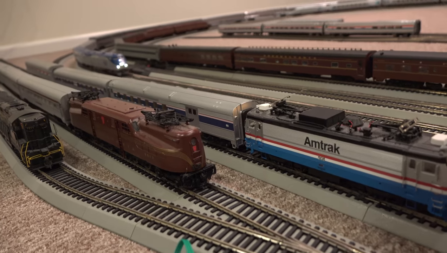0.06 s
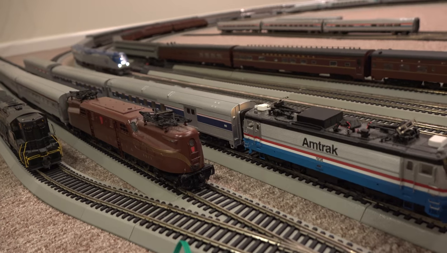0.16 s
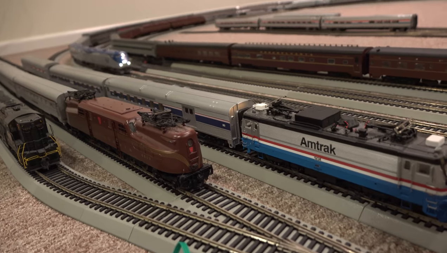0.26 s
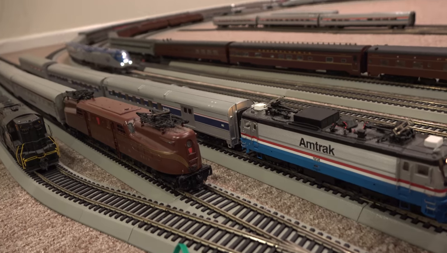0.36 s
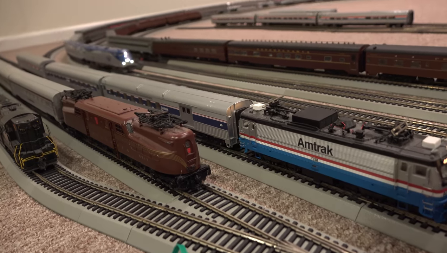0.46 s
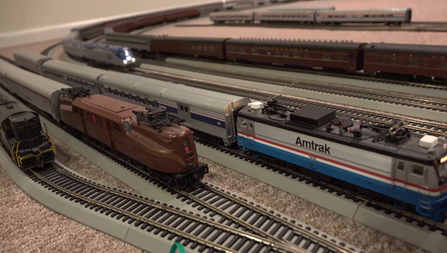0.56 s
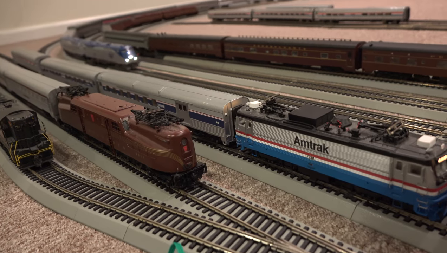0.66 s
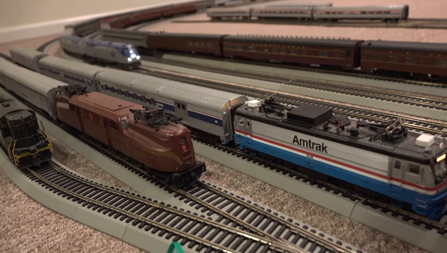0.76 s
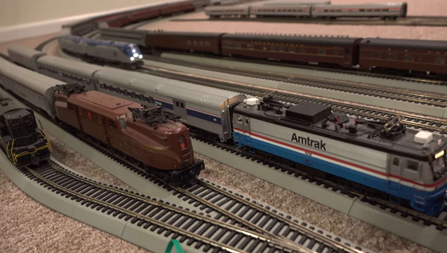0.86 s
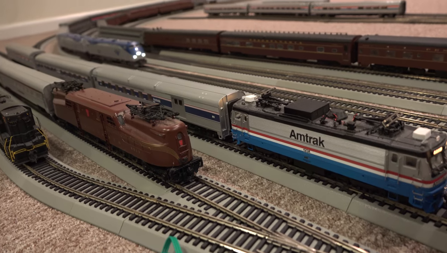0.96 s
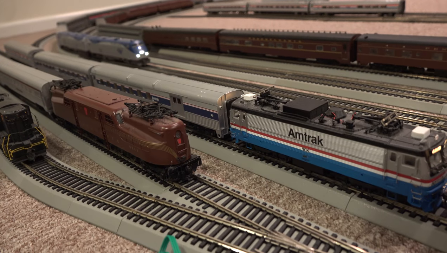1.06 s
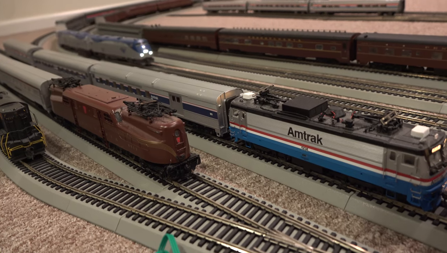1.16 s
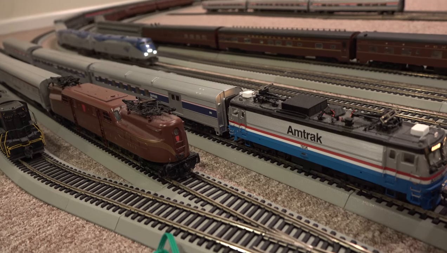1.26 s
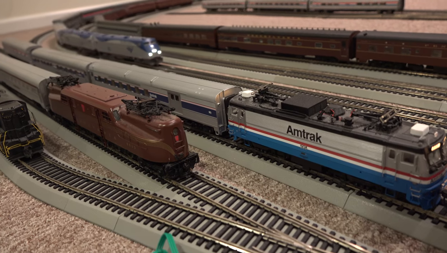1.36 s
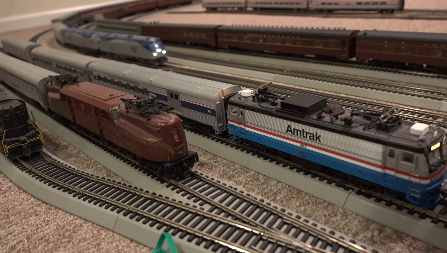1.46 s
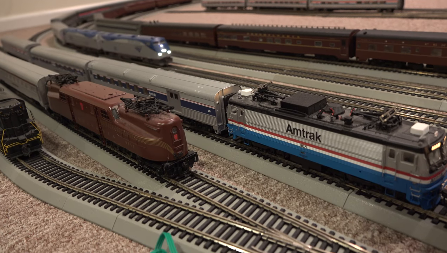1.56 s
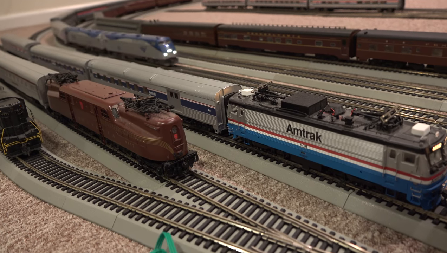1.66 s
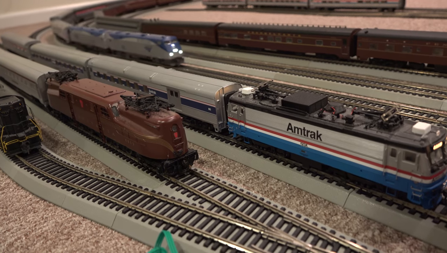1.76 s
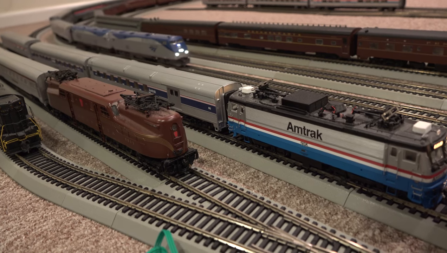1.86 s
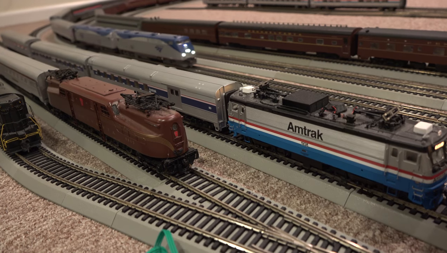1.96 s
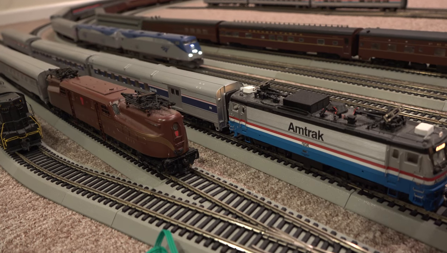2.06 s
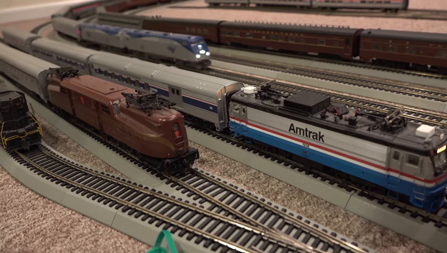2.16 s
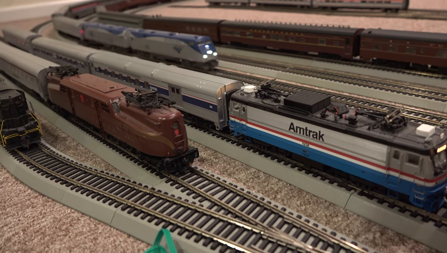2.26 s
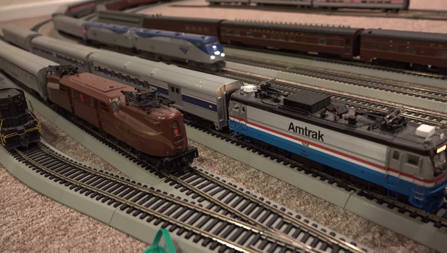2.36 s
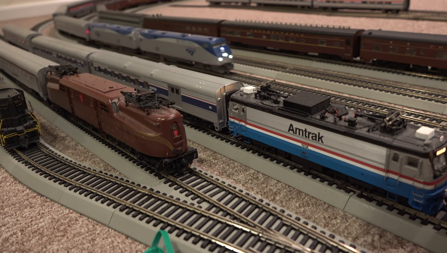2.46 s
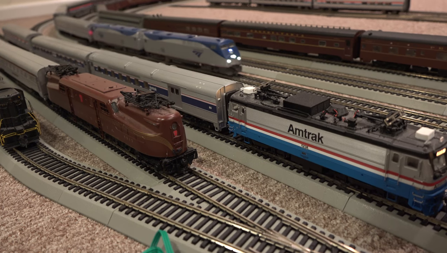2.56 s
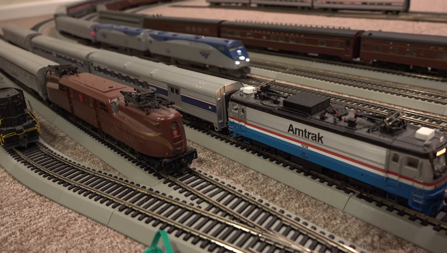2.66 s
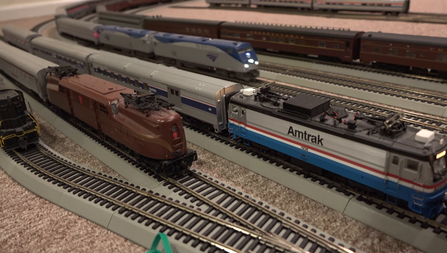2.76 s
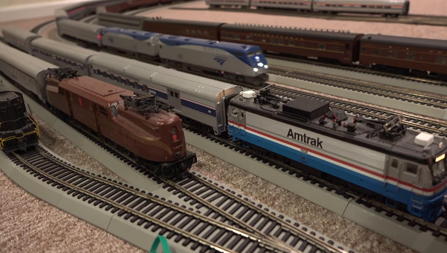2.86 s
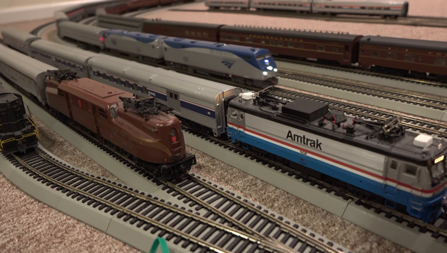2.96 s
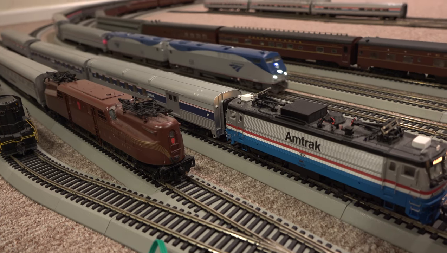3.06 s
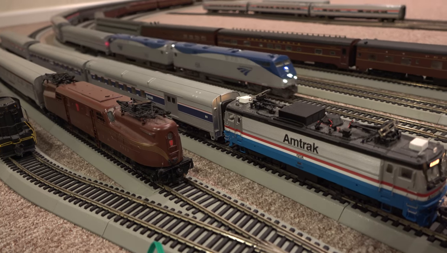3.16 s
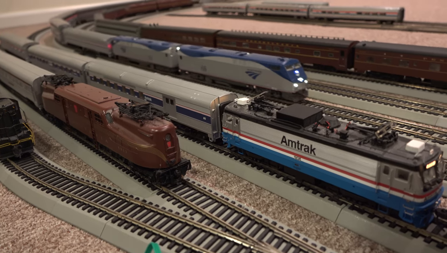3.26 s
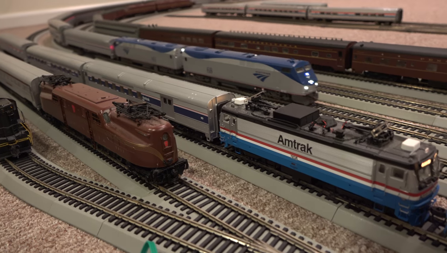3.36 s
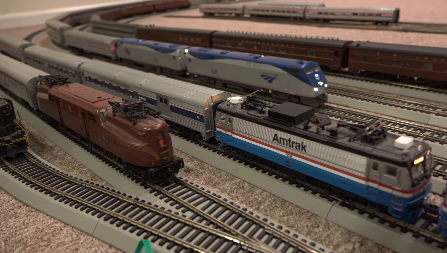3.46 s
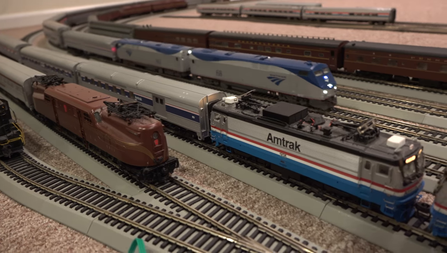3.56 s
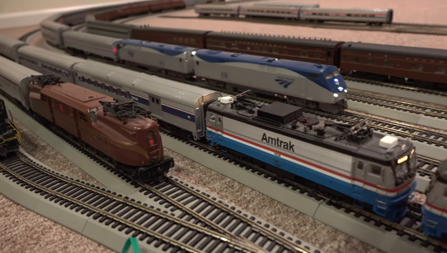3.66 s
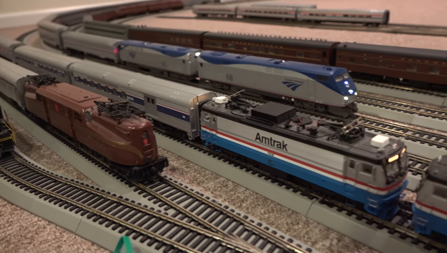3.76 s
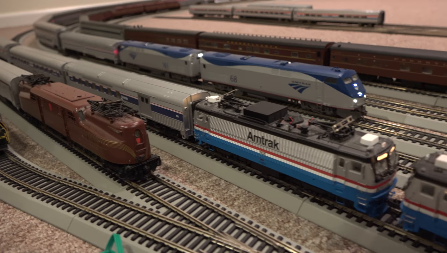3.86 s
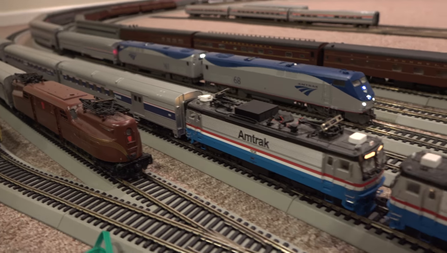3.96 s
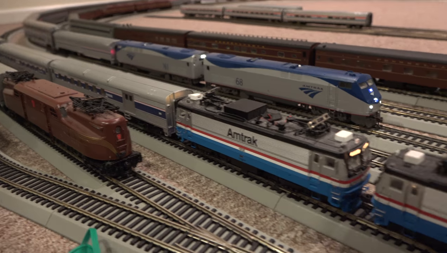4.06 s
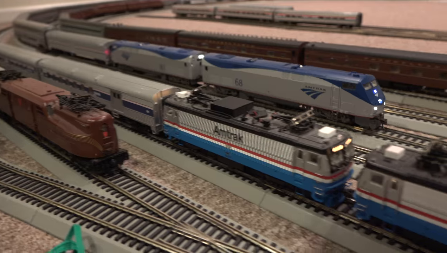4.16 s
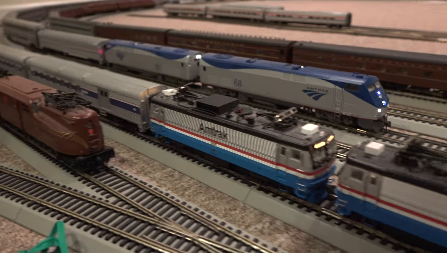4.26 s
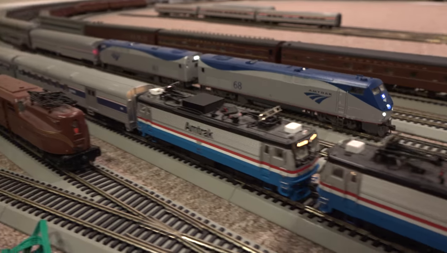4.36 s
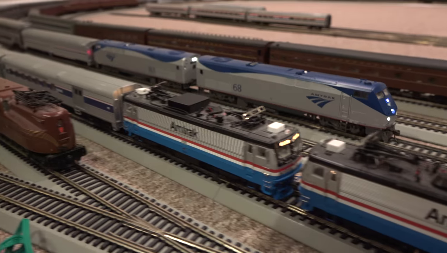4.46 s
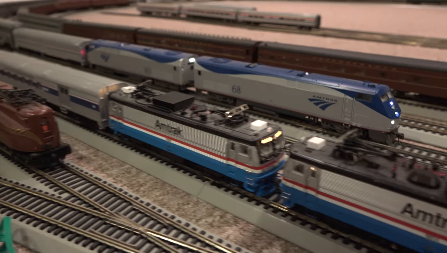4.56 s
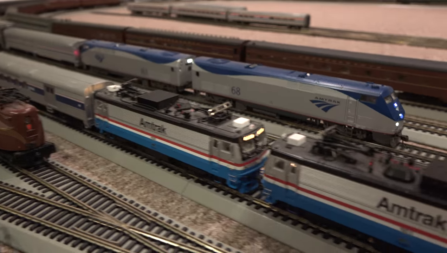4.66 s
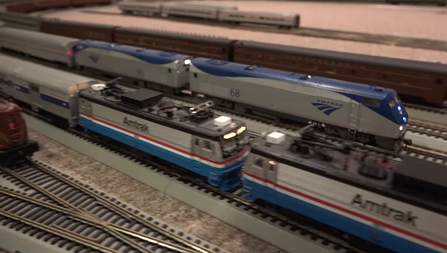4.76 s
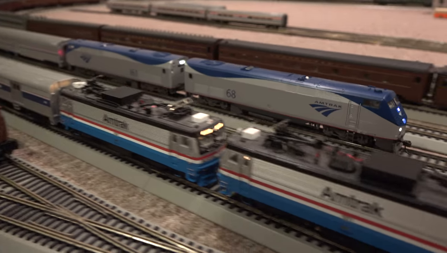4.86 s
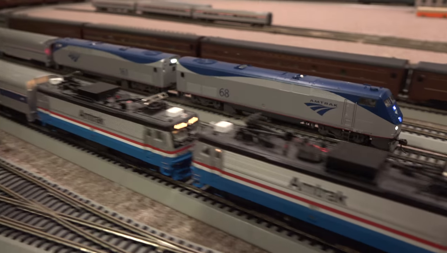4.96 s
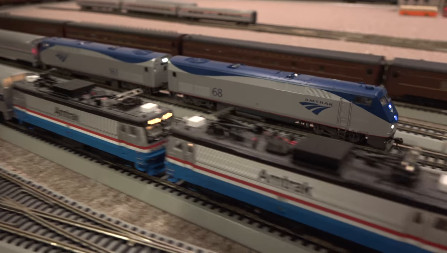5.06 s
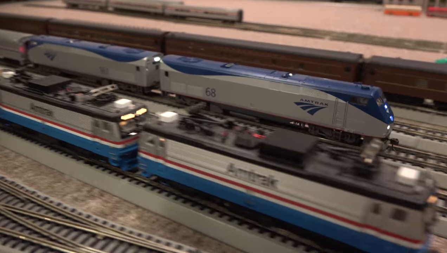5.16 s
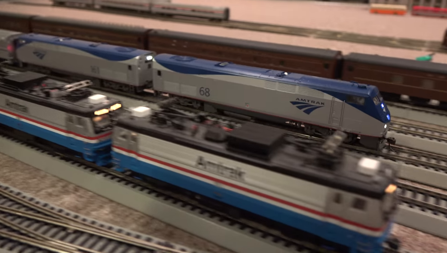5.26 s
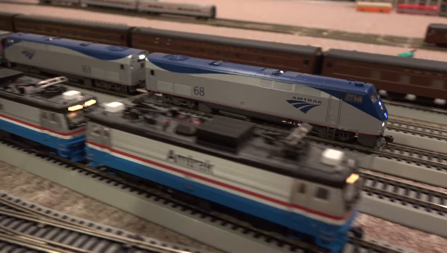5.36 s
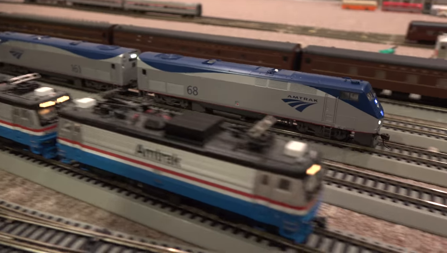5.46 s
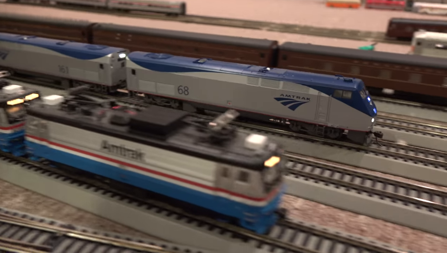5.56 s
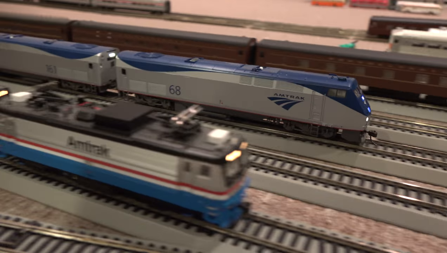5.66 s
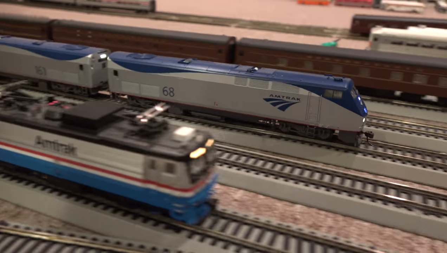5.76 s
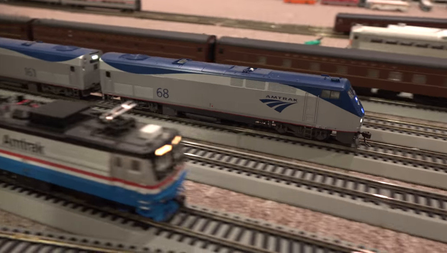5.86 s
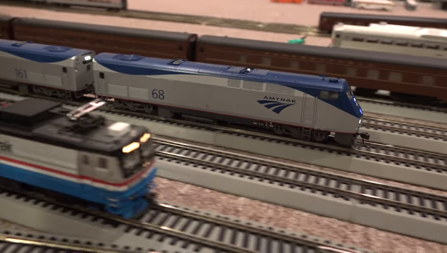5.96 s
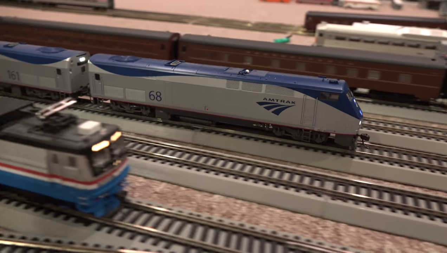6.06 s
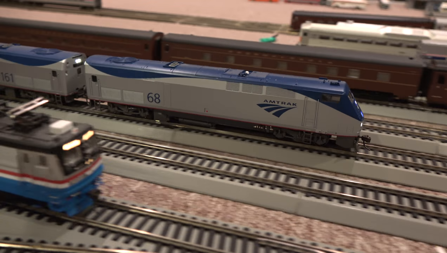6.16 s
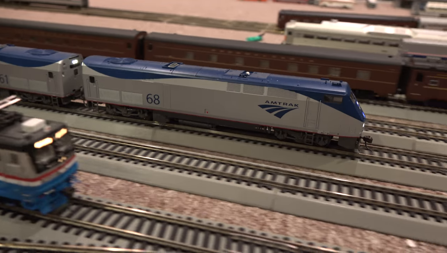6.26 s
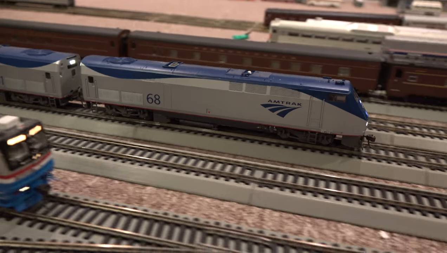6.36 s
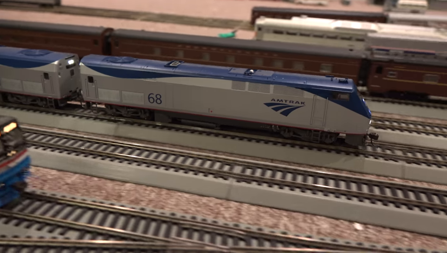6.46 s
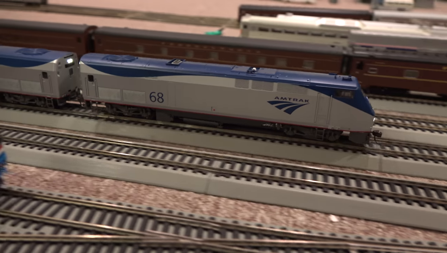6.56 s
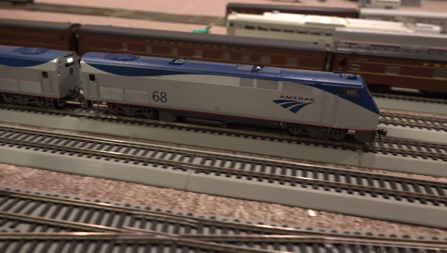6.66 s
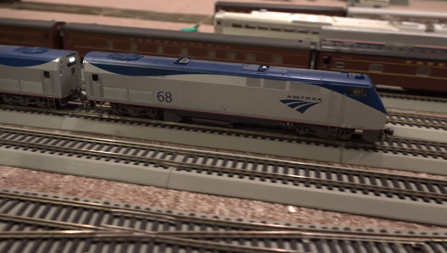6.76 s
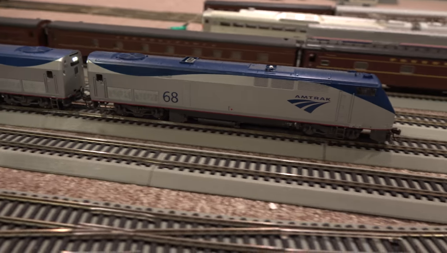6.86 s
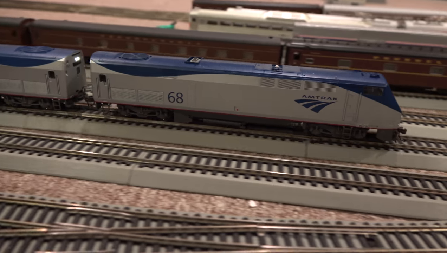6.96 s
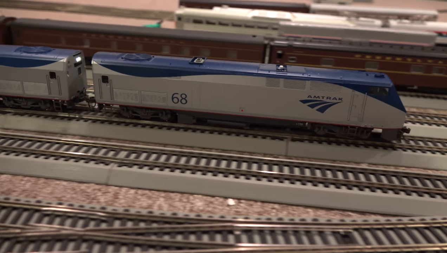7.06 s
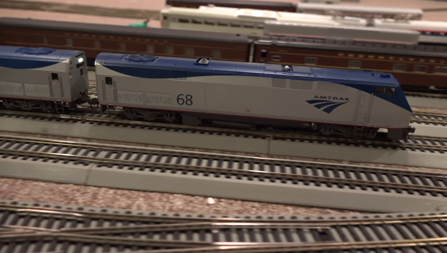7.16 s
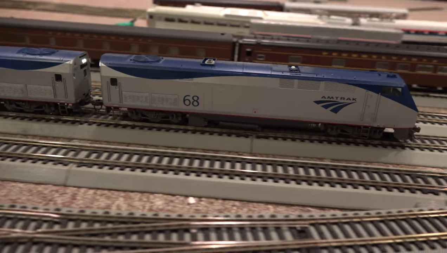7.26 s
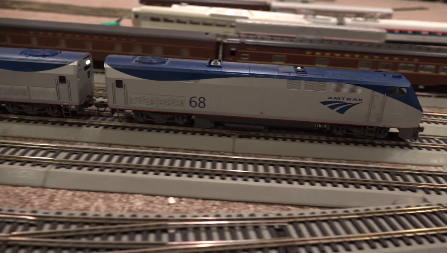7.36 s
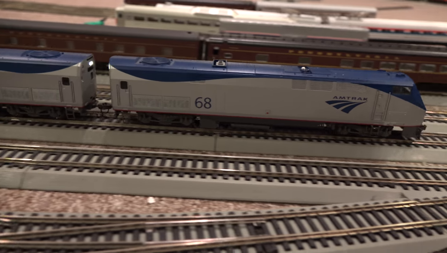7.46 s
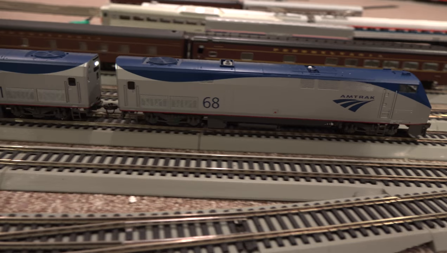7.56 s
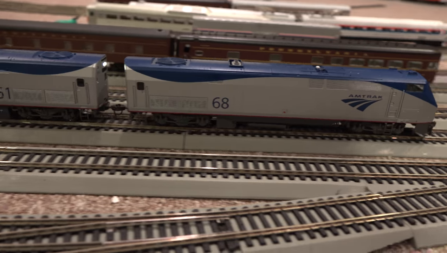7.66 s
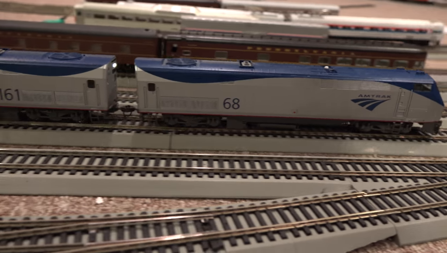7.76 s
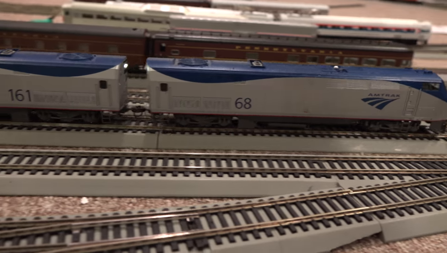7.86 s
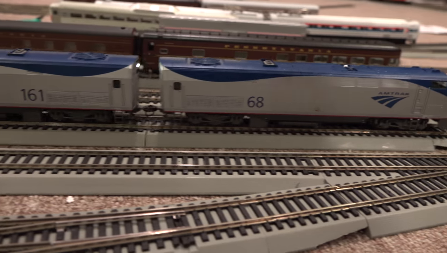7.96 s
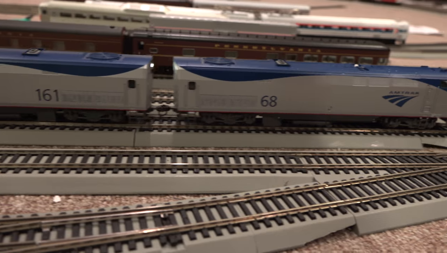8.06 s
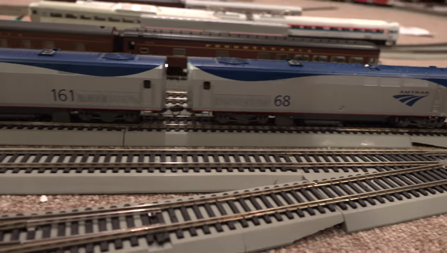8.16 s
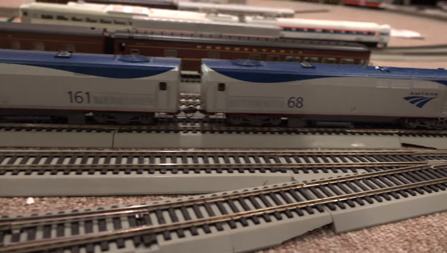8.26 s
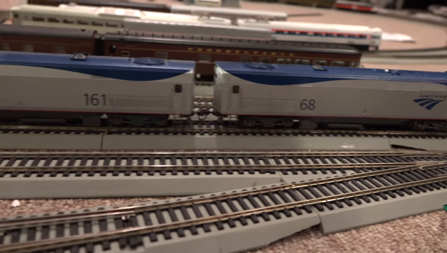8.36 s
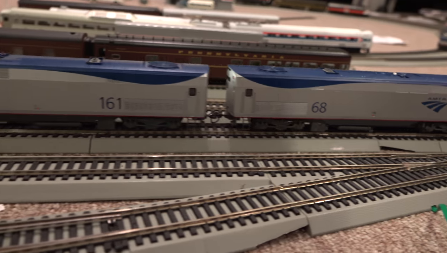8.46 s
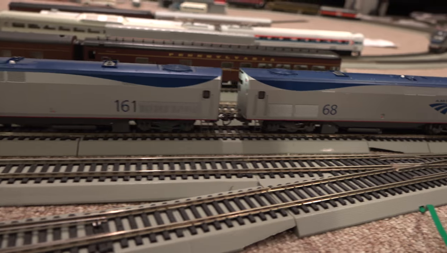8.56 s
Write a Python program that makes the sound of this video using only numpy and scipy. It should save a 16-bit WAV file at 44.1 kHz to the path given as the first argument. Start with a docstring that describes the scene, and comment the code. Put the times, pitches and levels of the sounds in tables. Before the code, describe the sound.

A small electric model train crawls along its track in a quiet room, its gears rattling in the plastic shell with a fast, uneven pulse. Faint high squeaks, brief rings and light wheel ticks come through the whir. Soft footsteps thud on the floor now and then. The train grows steadily louder, passes close to the microphone, then eases off a little.

```python
"""In a furnished room, over house rumble and faint microphone hiss, a small electric train crawls round a
carpet layout. From the start its gears rattle in the plastic shell, binding and surging once a turn. A far
axle begins to squeak, surges set wheels and panels ringing, and wheels tick on rail joints. From about
2.4 s the person holding the microphone steps on the floor now and then. The train passes close and is
loudest from 6 to 8 s, then eases off a little."""
import sys
import numpy as np
from scipy import signal
from scipy.fft import rfft, irfft, next_fast_len
from scipy.io import wavfile
from scipy.ndimage import uniform_filter1d, minimum_filter1d, map_coordinates

SR = 44100
rng = np.random.default_rng(int(sys.argv[2]) if len(sys.argv) > 2 else 0)


def store_wav(level_fs):
    """Save 16-bit WAV to argv[1]."""
    pcm = np.round(np.clip(np.atleast_2d(level_fs), -1, 1) * 32767)
    wavfile.write(sys.argv[1], SR, pcm.T.astype(np.int16))


N = 380141
T = np.arange(N) / SR
TURN_HZ, CUTOFF_HZ = 8.722, 15750   # turn rate of the uneven gear; top of the microphone's range


def amp(db):
    """Gain of a level in dB."""
    return 10 ** (np.asarray(db) / 20)


def rms_one(x):
    """Scales x to rms 1."""
    return x / np.sqrt(np.mean(x ** 2) + 1e-20)


def automation(rows):
    """One lane per column after time_s, sample by sample."""
    times, *columns = np.transpose(rows)
    return [np.interp(T, times, column) for column in columns]


def eq_curve(points, hz):
    """Reads (freq_hz, level_db) points on a log-frequency axis."""
    freqs, levels = np.transpose(points)
    return np.interp(np.log(hz + 1), np.log(freqs), levels)


def equalise(x, points, depth=1):
    """Filters x by an EQ curve whose dB are scaled by depth."""
    size = next_fast_len(N + SR // 4)
    hz = np.arange(size // 2 + 1) * SR / size
    return irfft(rfft(x, size) * amp(depth * eq_curve(points, hz)), size)[..., :N]


def drift(rate_hz):
    """Smooth random modulation with a spread near 1."""
    knots = rng.standard_normal(int(N / SR * 200) + 4)
    return map_coordinates(knots, [T * rate_hz], order=3)


def pan(x, db):
    """Mono to stereo, left louder by db."""
    return np.array([x * amp(db / 2), x * amp(-db / 2)])


def resonance(x, hz, width_hz):
    """Two-pole band-pass with unity gain at its peak."""
    r = np.exp(-np.pi * width_hz / SR)
    poles = [1, -2 * r * np.cos(2 * np.pi * hz / SR), r * r]
    return signal.lfilter(np.array([1, 0, -1]) * (1 - r * r) / 2, poles, x)


def region(start_s, end_s):
    """A region's samples, progress 0-1 through it, and a gain that fades in, holds and fades out."""
    span = slice(max(round(start_s * SR), 0), min(round(end_s * SR), N))
    progress = np.clip((T[span] - start_s) / (end_s - start_s), 0, 1)
    return span, progress, np.minimum(1.44 * np.sin(np.pi * progress), 1)


def delayed(x, lag_ms, span=slice(None)):
    """Plays a region of x through a gliding delay."""
    return map_coordinates(x, [np.arange(N)[span] - lag_ms * SR / 1000], order=1)


# Spectrum of the house rumble: freq_hz, level_db
RUMBLE_EQ = [(20, -17), (35, -9), (60, -6), (85, -2.5), (118, -1.5), (150, -5.5), (210, 4), (300, -19),
             (500, -45)]
def house_rumble():
    """A bed of low noise from the house, nearly mono."""
    mid, side = rms_one(equalise(rng.standard_normal((2, N)), RUMBLE_EQ))
    return np.array([mid + .12 * side, mid - .13 * side])


def microphone_hiss(level_db=-69):
    """The microphone's electronics hiss steadily in the top octave."""
    top_band = signal.butter(2, [9000, 14000], "band", fs=SR, output="sos")
    mid, side = signal.sosfilt(top_band, rng.standard_normal((2, N)))
    return amp(level_db) * rms_one(np.array([mid + .3 * side, mid - .33 * side]))


# Fine ripple of the gear load: cycles_per_turn, swing_db, phase_rad
LOAD_RIPPLE = [(2, 0.27, 2.0), (3, .55, 0.66), (5, .3, 2.5), (6, 0.46, -0.1), (7, 0.54, 1.8), (8, 0.85, 3),
               (9, .35, .2), (12, 0.1, 2.5)]
def throb(pattern=LOAD_RIPPLE):
    """A tremolo in dB that repeats with every turn of the gear."""
    return sum(db * np.cos(2 * np.pi * k * TURN_HZ * T + phase) for k, db, phase in pattern)


# The gear binds once a turn: centre_s, surge_db, length_s, brightness_db
SURGES = [(0.058, 1.5, 0.058, -3), (0.185, 5.5, 0.074, -2), (0.302, 4.5, 0.14, -1), (0.415, 6, 0.1, -3),
          (0.521, 6.5, 0.066, -1.5), (0.64, 4.1, 0.077, 0), (0.762, 6, 0.11, -1.5),
          (0.877, 6.5, 0.091, 1.5), (0.988, 6.5, 0.07, -2), (1.101, 4.5, 0.058, -1),
          (1.205, 4, 0.097, -1.5), (1.331, 4, 0.09, -4), (1.438, 4.5, 0.077, 1), (1.545, 3, 0.091, 0),
          (1.662, 5.5, 0.078, 1.1), (1.783, 4, 0.08, 1.5), (1.904, 5, 0.068, 2), (2.013, 4, 0.079, 1),
          (2.115, 2.5, 0.067, 1.0), (2.246, 4.5, 0.08, -1), (2.36, 3.5, 0.097, 0.5), (2.473, 5, 0.071, 1),
          (2.578, 6, 0.066, 3), (2.694, 4.5, 0.061, 0), (2.819, 6, 0.092, -0.5), (2.926, 5.5, 0.096, -1),
          (3.044, 6.5, 0.076, -1), (3.172, 5, 0.1, -0.5), (3.273, 4, 0.088, -0.5), (3.386, 5, 0.087, -3),
          (3.493, 5, 0.088, 1), (3.598, 4, 0.095, -0.5), (3.725, 5, 0.075, 2.5), (3.845, 4, 0.095, -0.5),
          (3.964, 5, 0.068, 1.5), (4.071, 3, 0.12, 3), (4.176, 3.5, 0.054, 2.5), (4.303, 4.6, 0.056, 0.5),
          (4.42, 2.5, 0.087, 0), (4.541, 4, 0.096, 0.5), (4.642, 6, 0.056, -0.5), (4.758, 6.5, 0.075, -1.5),
          (4.881, 8, 0.1, -4), (4.987, 8.5, 0.097, -0.2), (5.106, 6.5, 0.091, -2.5),
          (5.218, 5.5, 0.078, -1.5), (5.333, 3.5, 0.082, 2), (5.452, 4, 0.074, 0), (5.564, 5.5, 0.084, 2.5),
          (5.671, 4.5, 0.081, -0.3), (5.791, 7, 0.093, 0.5), (5.905, 5.5, 0.079, 0), (6.023, 4.5, 0.086, 0),
          (6.133, 4.5, 0.081, 0.1), (6.242, 3.5, 0.049, 0), (6.369, 4.5, 0.087, 0.5),
          (6.474, 2.5, 0.093, 1), (6.602, 2.5, 0.089, 1), (6.699, 5.5, 0.061, 1), (6.817, 4.6, 0.067, 1),
          (6.942, 7, 0.081, -2), (7.054, 7, 0.087, 0), (7.16, 6, 0.072, 0), (7.274, 5.5, 0.076, 0),
          (7.397, 4.5, 0.083, -2), (7.512, 3.5, 0.075, 0.5), (7.626, 4, 0.076, 5), (7.738, 5, 0.07, 0.5),
          (7.854, 6, 0.1, 2), (7.967, 5, 0.074, 1.5), (8.088, 6, 0.048, 1.8), (8.194, 3, 0.099, 3.5),
          (8.307, 3.1, 0.054, 3), (8.426, 5.5, 0.048, 0), (8.538, 1, 0.115, 1.5)]
def gear_load(squareness=2.5, wander_db=.28, flutter_db=.94):
    """Each bind pushes the rattle up and tilts its tone; squareness above 2 flattens the surge's top."""
    load_db, bright_db = np.zeros((2, N))
    for centre, surge_db, length, tilt_db in SURGES:
        span = region(centre - 2 * length, centre + 2 * length)[0]
        surge = np.exp(-np.abs(2 * (T[span] - centre) / length) ** squareness)
        load_db[span] += surge_db * surge
        bright_db[span] += tilt_db * surge
    load_db -= uniform_filter1d(load_db, size=SR // 2)   # swing about the running mean
    return load_db + throb() + wander_db * drift(30) + flutter_db * drift(120), bright_db


# Broad tone of the rattle: freq_hz, level_db
RATTLE_EQ = [(120, -54), (200, -30), (515, -16), (607, -14), (940, -13), (1400, -17), (2170, -5),
             (2380, -4), (2800, 0), (3420, -1.5), (3890, 0), (4840, -4), (6830, -31), (9310, -36.5),
             (10600, -41.5), (12400, -42.5), (14300, -51), (15500, -56)]
# Shell and track-bed resonances: pitch_hz, width_hz, gain_db
SHELL_MODES = [(894, 300, 4.5), (1615, 134, 4.5), (1878, 71, 2.5), (2200, 76, 3), (2550, 49, 6),
               (2836, 64, 3), (3140, 116, 3), (3740, 150, 0), (3940, 60, -1), (4680, 80, -0.5)]
def gear_rattle(hz, size, contacts_per_s=6500, spread_db=1.5, whir=.8):
    """Spectrum of uneven tooth contacts and brush whir sounding through the plastic shell."""
    hits = amp(spread_db * np.minimum(rng.exponential(1, N), 4)) * rng.choice([-1, 1], N)
    teeth = rms_one(hits * (rng.random(N) < contacts_per_s / SR))
    modes_db = sum(db / (1 + (2 * (hz - pitch) / width) ** 2) for pitch, width, db in SHELL_MODES)
    spectrum = rfft(teeth + whir * rng.standard_normal(N), size) * amp(eq_curve(RATTLE_EQ, hz) + modes_db)
    return spectrum * size / np.sqrt(2 * np.sum(np.abs(spectrum) ** 2))   # rms 1 as a waveform


# The locomotive's pass-by: time_s, level_db, pan_left_db
PASS_BY = [(0, -31.5, 1.8), (.4, -33, 2), (.75, -32.5, 2), (1.1, -31, 2.5), (1.5, -31.5, 1.5),
           (2.1, -30, 0.5), (2.5, -29.5, 0.6), (3.2, -28, -1), (4.2, -26, -1.1), (4.9, -27, -0.5),
           (5.5, -24, -0.8), (6, -21.5, 1), (6.4, -19.5, 1.4), (7, -20, 1), (7.65, -20.5, 2),
           (8.05, -24, 1.5), (8.35, -23.5, -1.7), (8.62, -23, 2)]
# The band that each zone of the shell radiates: centre_hz
ZONE_CENTRES = (350, 850, 1900, 3000, 4200, 5900, 9500)
# How each zone follows a surge's brightness: brightness_share
ZONE_TILTS = (0, 0.054, -0.31, -0.42, 0.38, 0.72, .2)
# Each zone's mix, and the one moment it faces the microphone or turns away:
# trim_db, load_share, approach_share, turn_centre_s, turn_length_s, turn_db
SHELL_ZONES = [(-1.0, 0.093, 0.4, 4.1, 1.16, 1), (-1.0, 0.18, 0.85, 4.94, 1.02, 4),
               (0.47, 0.68, 1.24, 7.2, 1.45, -6), (0.04, 0.93, 1.01, 3.82, 1.66, -5),
               (-0.54, 0.86, 1.11, 2.9, 0.95, 2.5), (-0.46, 1.04, 0.68, 8.09, 0.46, 5.5),
               (-.5, 0.91, 0.79, 4.87, 1.3, 3.5)]
def locomotive(flicker_db=1.02):
    """The rattle leaves by zones of the shell, each aimed its own way and riding the load and pass-by."""
    size = next_fast_len(N)
    hz = np.arange(size // 2 + 1) * SR / size
    spectrum = gear_rattle(hz, size)
    load_db, bright_db = gear_load()
    level_db = automation(PASS_BY)[0]
    out, mean_db = 0, level_db.mean()
    for k, (trim_db, load_share, approach_share, centre, length, turn_db) in enumerate(SHELL_ZONES):
        crossover = np.interp(np.log(hz + 1), np.log(ZONE_CENTRES), np.eye(len(ZONE_CENTRES))[k])
        band = irfft(spectrum * crossover, size)[:N]
        distance_db = mean_db + approach_share * (level_db - mean_db)
        aim_db = turn_db * np.exp(-2 * ((T - centre) / length) ** 2)
        surge_db = load_share * load_db + ZONE_TILTS[k] * bright_db
        out = out + band * amp(trim_db + distance_db + aim_db + surge_db + flicker_db * drift(55))
    return out


# Narrow peaks and dips in the rattle: start_s, end_s, from_hz, to_hz, width_hz, gain_db
SWEEPS = [(1, 7, 2000, 2330, 260, 3.5), (0, 5.1, 1924, 1820, 105, 7), (4.5, 7.87, 1680, 1486, 84, 6.5),
          (2.1, 4.1, 3300, 3790, 120, 5.5), (4.5, 6.46, 3830, 3770, 63, 5.5), (6, 7.58, 4150, 3760, 140, 6),
          (4, 6, 2740, 2500, 90, -9), (2.5, 4.08, 5600, 5500, 410, 8), (4, 6.44, 5960, 6260, 215, 10),
          (5, 6.9, 5720, 5500, 270, -10), (0.3, 2.8, 2270, 2100, 190, 5.5), (-0.1, 1.9, 2300, 2320, 98, -9),
          (4.5, 7.5, 10400, 10500, 500, -4), (6, 12, 2340, 2040, 330, -8.5), (8.5, 8.8, 2810, 2790, 66, 4),
          (8.5, 8.7, 4500, 4420, 130, 6.5), (7.5, 9.3, 1990, 1900, 83, 6), (6.5, 8.96, 1060, 930, 100, 6.5),
          (1.5, 4.9, 850, 820, 68, 4), (6, 7.9, 3220, 2800, 150, 4), (5, 7.5, 8800, 9600, 1240, 4.5),
          (7, 9.1, 9200, 9400, 790, 7), (6.5, 7.8, 7200, 7360, 750, -3.5), (7.5, 8.5, 6500, 5600, 360, 3.5),
          (7, 13, 616, 620, 33, 5.5), (2.6, 14, 624, 622, 9.2, 10), (2.9, 9.3, 339, 332, 9.1, 9),
          (0, 3, 5900, 4650, 330, 4), (0.5, 2.55, 7600, 6700, 760, 6), (5.5, 6.5, 3000, 4300, 550, -1),
          (0.5, 7.8, 1700, 1340, 110, -3.5), (.3, 3.2, 1200, 1200, 150, -4.5),
          (4.5, 7.2, 1120, 1060, 120, 3), (6.5, 8.8, 1370, 1280, 90, 4.5), (-.5, 1, 1650, 1600, 180, 2.5),
          (1.5, 3.2, 2600, 2300, 75, 2.5), (3.8, 5.5, 2340, 2420, 70, 3.5), (7, 8.4, 2680, 2460, 90, 3),
          (4.5, 6.9, 3710, 3500, 70, -8), (7, 8.5, 3800, 3240, 64, -9), (5.7, 7.6, 4330, 4110, 64, -6),
          (7.5, 8.2, 4470, 4130, 55, -6), (7.5, 8.2, 4770, 4440, 60, -5), (7.5, 8.3, 5020, 4760, 60, -5),
          (7.5, 9, 3060, 2910, 70, -9), (8.15, 8.9, 3530, 3300, 70, -8), (5, 7.3, 5420, 5140, 120, -5),
          (4.5, 5.7, 3300, 3220, 70, -4), (8.5, 9.1, 4000, 4180, 60, -7), (2.3, 3.6, 4960, 4400, 100, -6),
          (1.5, 3, 3530, 3400, 100, -5), (1.2, 3.2, 2870, 2720, 100, -4), (2.2, 5.5, 2200, 2200, 60, 3.5)]
def tone_sweeps(rattle):
    """Gliding bands of the rattle swell or thin out for a while."""
    out = rattle.copy()
    for start, end, from_hz, to_hz, width_hz, gain_db in SWEEPS:
        span, progress, fade = region(start, end)
        carrier = np.exp(2j * np.pi * np.cumsum(from_hz + (to_hz - from_hz) * progress) / SR)
        r = np.exp(-np.pi * width_hz / SR)
        # shift the band down to 0 Hz, low-pass it, shift it back
        band = 2 * np.real(signal.lfilter([1 - r], [1, -r], rattle[span] / carrier) * carrier)
        out[span] += (amp(gain_db * fade) - 1) * band
    return out


# Extra tremolo on the gear whine: cycles_per_turn, swing_db, phase_rad
WHINE_RIPPLE = [(2, 0.6, 0.98), (3, 0.9, 0.0095), (6, 0, -.3), (7, 1.5, 0.88), (8, 1.3, 1.7),
                (9, 0.7, -0.36)]
def gear_whine(rattle, pitch_hz=2190, width_hz=360):
    """The band where the gears whine chatters harder than the rest of the rattle."""
    return rattle + (amp(throb(WHINE_RIPPLE)) - 1) * resonance(rattle, pitch_hz, width_hz)


# Treble bounces off the floor and parked trains: start_s, end_s, from_lag_ms, to_lag_ms, signed_gain
BRIGHT_BOUNCES = [(-.6, 1, 2.84, 2.98, -.12), (-.5, 3.5, 1.28, 1.2, -.12), (1.8, 2.66, 1.9, 1.9, -.2),
                  (1.8, 4.48, .57, .73, -0.26), (2, 4.76, 2.3, 2.57, -0.22), (4, 6.76, 1.17, 1.15, -.25),
                  (4.2, 6.73, 2.66, 3.5, -0.28), (5.9, 7.6, 1.1, 1.3, 0.17), (6.2, 8.3, 2.9, 3.23, -.33),
                  (6.2, 9.45, 2.7, 2.8, -.18), (8, 9.34, 2.6, 2.9, -0.34), (7.5, 9.5, 0.53, .55, -0.097)]
# A duller bounce off the flank of a parked train: time_s, lag_ms, gain
DULL_BOUNCE = [(0, 2.24, 0.039), (4, 2.78, 0.14), (6, 2.87, 0.28), (7, 2.9, 0.082), (7.8, 3.1, 0.32),
               (8.62, 3.52, 0.48)]
def early_reflections(rattle, split_hz=1640):
    """Near surfaces comb the rattle's highs and lows separately as the train moves along them."""
    dull = signal.sosfiltfilt(signal.butter(2, split_hz, fs=SR, output="sos"), rattle)
    bright = rattle - dull
    for start, end, from_ms, to_ms, gain in BRIGHT_BOUNCES:
        span, progress, fade = region(start, end)
        bright[span] += gain * fade * delayed(bright, from_ms + (to_ms - from_ms) * progress, span)
    lag_ms, gain = automation(DULL_BOUNCE)
    return bright, dull + gain * delayed(dull, lag_ms)


# Stereo width of the reverb: freq_hz, side_gain_db
REVERB_WIDTH = [(100, -8), (500, -19.5), (1200, -28), (2000, -25.5), (3200, -27), (5000, -20), (6500, -10),
                (8500, -2.5), (11000, -5), (14000, -11)]
# The reverb's centre recedes as the train nears: time_s, mid_trim_db
REVERB_RIDE = [(0, 4.5), (5, 0.5), (6.5, -6), (8.62, -0.5)]
def room_reverb(train, stretches=16, t60_s=.2, build_s=.0032, mid_db=-6):
    """The train moves, so each stretch of its path gets a tail of its own, cross-faded."""
    hop, length = N // stretches + 1, SR // 3
    t = np.arange(length) / SR
    crossfade = np.hanning(2 * hop + 1)[:-1]
    decay = amp(-60 * t / t60_s) * np.minimum(t / build_s, 1)
    padded, out = np.pad(train, (hop, 2 * hop)), np.zeros((2, N + 3 * hop + length))
    for i in range(0, N + hop, hop):
        tails = rng.standard_normal((2, length)) * decay / np.sqrt(np.sum(decay ** 2))
        wet = signal.fftconvolve(tails, (padded[i:i + 2 * hop] * crossfade)[None])
        out[:, i:i + wet.shape[1]] += wet
    mid, side = out[:, hop:hop + N]
    side = equalise(side, REVERB_WIDTH)
    mid = mid * amp(mid_db + automation(REVERB_RIDE)[0])
    return np.array([mid + side, mid - side])


# Where the rolling bass sits: time_s, pan_left_db
BASS_PAN = [(0.0, 0), (2.54, -0.5), (3.48, -3.5), (4.97, -4), (6.12, -0.7), (7.42, -2), (7.73, -0.7),
            (8.62, -3)]
# Left-right colour of the train: freq_hz, pan_left_db
STEREO_EQ = [(150, 7), (500, 0), (1000, -0.5), (2000, 0.7), (5000, -0.5), (8000, 2), (12000, 0.5)]
def train_in_room(bright, dull):
    """Pans highs and lows on their own paths, adds the room and tints the two sides oppositely."""
    direct = pan(bright, automation(PASS_BY)[1]) + pan(dull, automation(BASS_PAN)[0])
    left, right = direct + room_reverb(bright + dull)
    return np.array([equalise(left, STEREO_EQ, depth=.5), equalise(right, STEREO_EQ, depth=-.5)])


# Squeaks of the far axle: centre_s, level_db, pitch_hz
AXLE_SQUEAKS = [(0.114, -54, 7050), (.225, -65, 11300), (.305, -51, 7200), (.49, -55, 7200),
                (.645, -59, 9520), (.69, -57, 7000), (.87, -45.5, 7100), (1.055, -53, 7000),
                (1.34, -64, 13260), (1.344, -54, 7100), (1.66, -62, 11840), (1.7, -56, 6900),
                (1.803, -47, 7200), (1.985, -45, 7250), (2.125, -62, 11000), (2.57, -52, 7400),
                (2.76, -56, 7400), (2.95, -54, 7300), (3.14, -57, 7100), (3.32, -54, 7600),
                (3.655, -60, 10200), (3.70, -53, 7450), (3.72, -64, 11840), (4.09, -54, 6960),
                (4.22, -52, 10760), (4.265, -49, 7330), (4.46, -51, 7170), (4.65, -49, 7180),
                (4.80, -54, 10740), (4.84, -54, 7050), (4.9, -61, 9790), (4.99, -54, 10700),
                (5.585, -52, 7120), (6.095, -61, 14120)]
def axle_squeaks(width_hz=380, rise_s=.031, fall_s=.039, octave_db=-21):
    """The axle sticks and slips: short bursts of narrowly resonant noise, wide and to the left."""
    out, length = np.zeros((2, N)), 4000
    t = (np.arange(length) - length // 2) / SR
    envelope = np.exp(-(2 * t / np.where(t < 0, rise_s, fall_s)) ** 2)
    for centre, level_db, hz in AXLE_SQUEAKS:
        noise = rng.standard_normal((2, length))
        burst = rms_one(resonance(resonance(noise + noise[0], hz, width_hz), hz, width_hz))
        if 2 * hz < CUTOFF_HZ:
            octave = resonance(resonance(noise, 2 * hz, 2 * width_hz), 2 * hz, 2 * width_hz)
            burst += amp(octave_db) * rms_one(octave)
        at = round(centre * SR) - length // 2
        out[:, at:at + length] += amp(level_db) * burst * envelope
    return out * amp([[1.5], [-1.5]])


# Brief rings of a wheel or panel: centre_s, level_db, length_s, pitch_hz
PANEL_RINGS = [(0.171, -44, 0.069, 2050), (0.172, -51, 0.062, 5400), (0.188, -44, 0.055, 4370),
               (0.301, -47, 0.2, 2530), (0.51, -44.1, 0.055, 2029), (0.776, -53, 0.057, 5900),
               (0.814, -47, 0.13, 5300), (0.884, -42, 0.064, 2766), (0.996, -46, 0.058, 1950),
               (1.418, -47, 0.073, 5198), (1.421, -42, 0.058, 5444), (1.669, -42, 0.084, 4340),
               (1.674, -35, 0.083, 3810), (1.678, -39.5, 0.068, 2145), (1.762, -37, 0.064, 1930),
               (1.954, -31.5, 0.063, 2570), (1.985, -41, 0.087, 3870), (2.337, -35, 0.066, 2250),
               (2.444, -36, 0.136, 3750), (2.475, -33, 0.058, 4376), (2.589, -38, 0.064, 2202),
               (2.811, -34.3, 0.1, 2180), (2.936, -39.3, 0.06, 5350), (3.045, -35, 0.077, 2166),
               (3.291, -32, 0.07, 3780), (3.287, -34, 0.065, 2158), (3.396, -34, 0.059, 2170),
               (3.484, -34.5, 0.055, 3753), (3.611, -34, 0.11, 2193), (3.716, -31, 0.067, 3796),
               (3.736, -30, 0.068, 2180), (4.06, -31, 0.08, 2246), (4.295, -31, 0.065, 4528),
               (4.325, -34, 0.064, 2180), (4.387, -33, 0.064, 4660), (4.413, -33.1, 0.088, 2215),
               (4.645, -32, 0.093, 3910), (4.66, -33.5, 0.078, 2210), (4.747, -39, 0.066, 4614),
               (4.749, -37, 0.093, 3880), (4.883, -36, 0.119, 3790), (4.904, -37, 0.163, 2270),
               (5.11, -33.8, 0.073, 2228), (5.271, -33, 0.128, 3053), (5.323, -38, 0.12, 2170),
               (5.342, -30.5, 0.079, 3790), (5.346, -28.5, 0.069, 2935), (5.78, -51, 0.078, 5993),
               (5.781, -23, 0.07, 3785), (5.806, -35, 0.09, 2193), (6.019, -33, 0.067, 4630),
               (6.12, -28, 0.078, 2820), (6.144, -36, 0.082, 3762), (6.271, -36, 0.092, 1635),
               (6.583, -40, 0.061, 1585), (6.603, -26, 0.054, 4360), (6.697, -26, 0.066, 3640),
               (6.823, -27, 0.096, 3936), (6.95, -26, 0.073, 3960), (6.96, -39.5, 0.058, 5720),
               (7.0, -33, 0.2, 3620), (7.06, -32, 0.073, 3948), (7.07, -32, 0.16, 4700),
               (7.173, -25, 0.061, 3896), (7.175, -30, 0.062, 2640), (7.3, -31, 0.15, 4200),
               (7.346, -32, 0.15, 3090), (7.412, -27, 0.099, 3790), (7.51, -38.2, 0.058, 1850),
               (7.843, -33, 0.084, 3990), (7.871, -31, 0.078, 2810), (8.058, -28.5, 0.12, 4775),
               (8.083, -40.3, 0.056, 6000), (8.153, -30.5, 0.14, 2534), (8.202, -33, 0.07, 2820),
               (8.217, -40.9, 0.064, 5680), (8.31, -31, 0.08, 2810), (8.423, -36, 0.07, 2010),
               (8.426, -25, 0.064, 4510), (8.439, -31, 0.067, 2790), (8.528, -28, 0.12, 4430)]
def panel_rings(width_hz=91, steadiness=.7, throb_depth=2.4):
    """A surge sets a wheel or panel ringing: a wavering tone swells and fades, chattering with the gear."""
    out, r = np.zeros(N), np.exp(-np.pi * width_hz / SR)
    for centre, level_db, length, hz in PANEL_RINGS:
        span = region(centre - 2 * length, centre + 2 * length)[0]
        t = T[span]
        real, imag = signal.lfilter([1], [1, -2 * r, r * r], rng.standard_normal((2, SR)))[:, -len(t):]
        wander = real + 1j * imag
        wander /= np.abs(wander) ** steadiness   # evens the level, leaves the phase wandering
        tone = rms_one(np.real(wander * np.exp(2j * np.pi * hz * t)))
        out[span] += amp(level_db) * tone * np.exp(-.6 * (2 * (t - centre) / length) ** 2)
    return out * amp(throb_depth * throb())


# Wheels meet rail joints: start_s, prefilter_level_db
RAIL_JOINTS = [(0.5147, -39), (.6873, -48), (.8624, -45), (1.3513, -44), (1.5214, -51), (2.4219, -50),
               (2.7337, -48), (3.0385, -43), (3.2106, -41), (3.6551, -48.5), (3.8696, -55), (4.0407, -36),
               (4.2767, -46), (4.4702, -43), (4.59, -42), (4.8933, -48), (5.251, -35), (5.4216, -37),
               (5.5563, -39), (5.679, -52), (5.7274, -42), (5.7887, -33), (5.9529, -39), (6.3395, -42),
               (6.3864, -44), (6.7865, -45), (6.9348, -35), (6.9556, -42), (7.0249, -41), (7.0998, -40),
               (7.449, -41), (7.5981, -43), (7.715, -45), (7.7657, -48), (7.9382, -37), (8.0596, -38),
               (8.2452, -41), (8.306, -39), (8.392, -46), (8.5639, -38), (8.5899, -40.5)]
def wheel_ticks(t60_s=.0091, faint_per_s=9, faint_db=-29, pan_left_db=3):
    """A steel wheel drops into a gap with a bright snap; faint random ticks follow the pass-by's level."""
    length = 900
    out = np.zeros((2, N + length))
    pass_db = automation(PASS_BY)[0]
    faint_starts = np.flatnonzero(rng.random(N) < faint_per_s / SR)
    faint = [(i / SR, pass_db[i] + faint_db + rng.normal(0, 3)) for i in faint_starts]
    for start, level_db in RAIL_JOINTS + faint:
        snap = rng.standard_normal(length) * amp(-60 * np.arange(length) / SR / t60_s)
        out[:, round(start * SR):][:, :length] += pan(amp(level_db) * snap, pan_left_db)
    return signal.sosfilt(signal.butter(2, [6500, 14500], "band", fs=SR, output="sos"), out[:, :N])


# Footfalls through the floor: start_s, level_db, pitch_hz, thud_t60_s
FOOTFALLS = [(2.442, -43.5, 131.5, 0.3), (2.998, -45, 121, 0.38), (3.243, -36.5, 121, 0.47),
             (3.721, -44.5, 96, 0.36), (4.46, -50, 75, .15), (4.61, -50, 110, 0.37),
             (4.923, -41.5, 111, 0.5), (6.684, -43, 96, 0.64), (7.451, -46, 88.8, 0.81),
             (8.448, -50, 113, 0.34)]
def footsteps(rumble, boards_hz=116.2, boards_db=-12, weight_hz=55, swell_db=-23, pan_left_db=2.4):
    """Each foot lands with a dull push and a noisy thud; the boards boom on and the rumble swells."""
    out, length = np.zeros((2, N + SR)), SR // 2
    t = np.arange(length) / SR
    envelope = np.minimum(t / .011, 1) * np.minimum((.5 - t) / .1, 1)
    swell = np.zeros(N)
    for start, level_db, hz, t60 in FOOTFALLS:
        noise = resonance(resonance(rng.standard_normal(length + 4000), hz, 100), hz, 140)
        thud = .96 * rms_one(noise[4000:]) * amp(-60 * t / t60)
        push = np.sin(2 * np.pi * hz * t) * amp(-60 * t / (.17 * t60))
        boards = np.sin(2 * np.pi * boards_hz * t) * amp(boards_db - 60 * t / (3.1 * t60))
        boards *= np.minimum(t / .13, 1)   # slow bloom
        weight = .15 * np.sin(2 * np.pi * weight_hz * t) * amp(-60 * t / t60)
        step = amp(level_db) * (push + thud + boards + weight) * envelope
        out[:, round(start * SR):][:, :length] += pan(step, pan_left_db)
        swell += amp(level_db + swell_db) * np.exp(-((T - start - .12) / .16) ** 2)   # crests 0.12 s late
    return out[:, :N] + swell * rumble


def scene(rumble_db=-65.5):
    """Mixes the beds, the train in its room, and the squeaks, ticks and footsteps around it."""
    rumble = house_rumble()
    beds = amp(rumble_db) * rumble + microphone_hiss()
    rattle = gear_whine(tone_sweeps(locomotive()))
    bright, dull = early_reflections(rattle)
    train = train_in_room(bright + panel_rings(), dull)
    return beds + train + axle_squeaks() + wheel_ticks() + footsteps(rumble)


def record(dry, ceiling=.53):
    """The microphone rolls off the deep bass, a limiter holds the peaks, the top is cut."""
    dry = signal.sosfilt(signal.butter(1, 25, "high", fs=SR, output="sos"), dry)
    allowed_gain = np.minimum(ceiling / (np.abs(dry).max(axis=0) + 1e-9), 1)
    gain = uniform_filter1d(minimum_filter1d(allowed_gain, size=265), size=265)   # 6 ms hold and ramp
    return signal.sosfilt(signal.ellip(10, .5, 70, CUTOFF_HZ, fs=SR, output="sos"), gain * dry)


dry = scene()
out = record(dry)
store_wav(out)
```